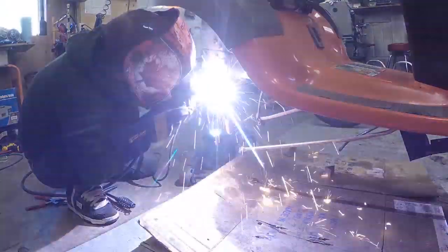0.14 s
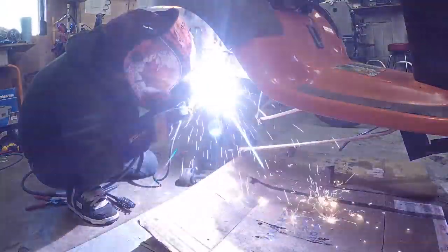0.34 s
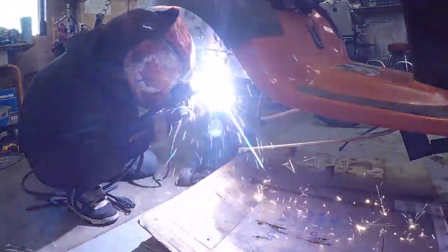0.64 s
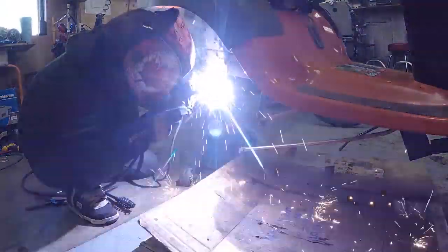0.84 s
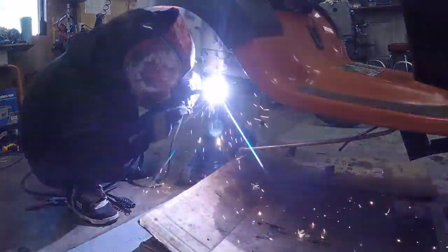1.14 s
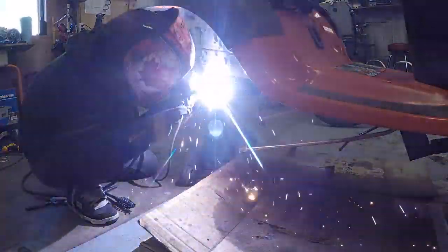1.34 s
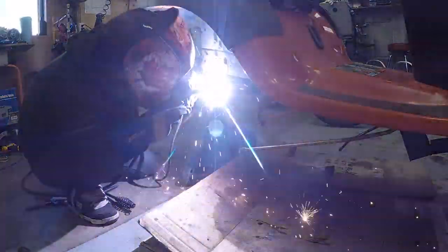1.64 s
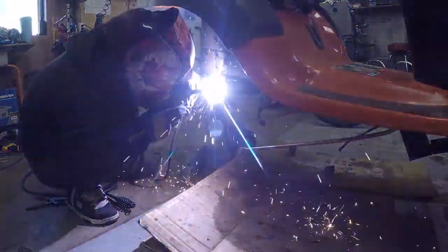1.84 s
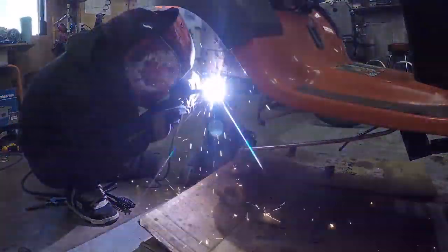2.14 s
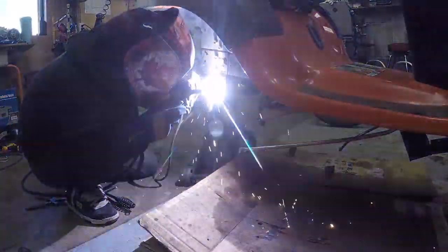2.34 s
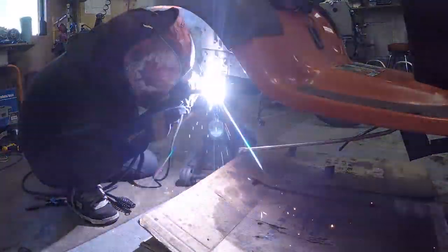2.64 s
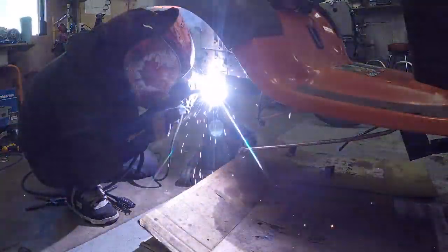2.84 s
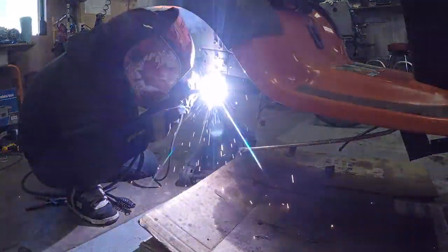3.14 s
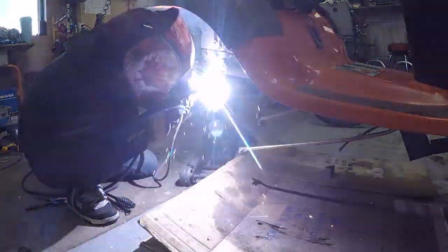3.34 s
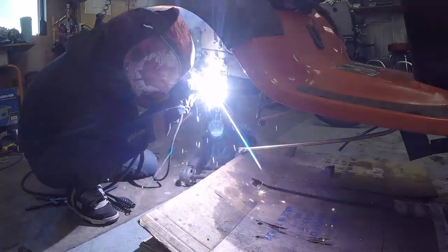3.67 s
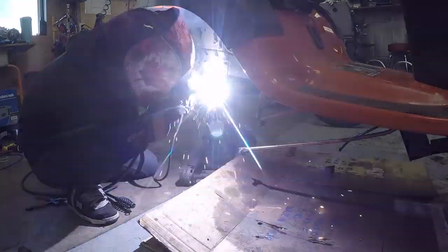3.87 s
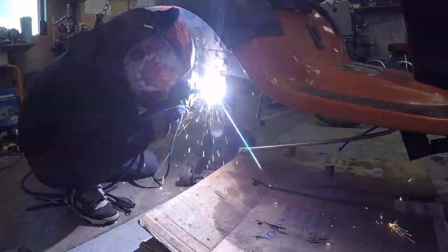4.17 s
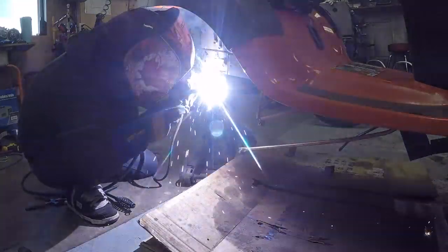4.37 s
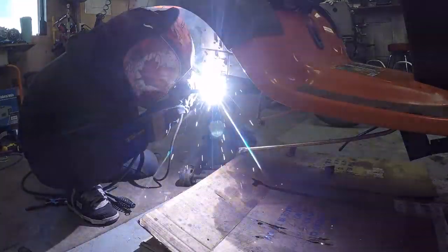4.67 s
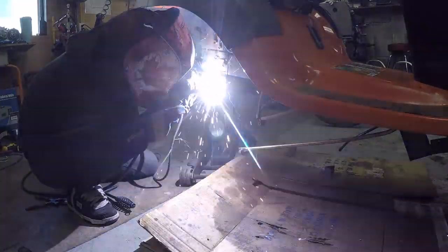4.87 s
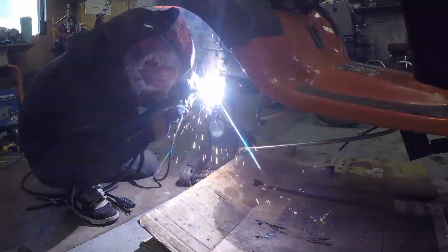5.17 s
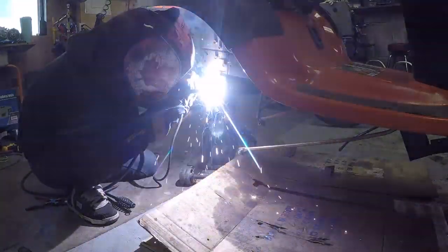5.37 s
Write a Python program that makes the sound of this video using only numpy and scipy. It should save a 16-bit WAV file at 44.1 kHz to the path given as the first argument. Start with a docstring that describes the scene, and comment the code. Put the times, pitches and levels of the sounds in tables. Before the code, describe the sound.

Close to the microphone, a welding arc on steel spits and fries in rapid surges, each sagging briefly before the next. Irregular sharp pops of bursting metal drops punctuate it, the loudest a little after three seconds. Below run a steady low transformer hum, a fan's whir, a slow motor throb and soft cooling air. Short metallic reflections and a small workshop tail surround the crackle. Mono, already running at the start and still going at the end.

```python
"""Close by, a stick-welding arc fries in surges and pops on steel brackets, inside a workshop.
The frying is random snaps over thin hiss, crowded at the crests of the current; each pop is one click as a
drop of metal bridges the gap and bursts. Steel resonances colour them, and echoes and a tail give the room.
Underneath, sine lines make the welding transformer's hum, its fan's whir and a slow motor's throb;
filtered noise makes the rush of cooling air."""
import sys
import numpy as np
from scipy import signal
from scipy.fft import rfft, irfft, next_fast_len
from scipy.io import wavfile

SR = 44100
rng = np.random.default_rng(int(sys.argv[2]) if len(sys.argv) > 2 else 0)


def master(y):
    """Save y as 16-bit WAV."""
    cut = np.clip(np.atleast_2d(y).T, -1, 1)
    pcm = np.round(cut * 32767)  # scale
    wavfile.write(sys.argv[1], SR, pcm.astype(np.int16))


N = 242991
TIME = np.arange(N) / SR
SIZE = next_fast_len(N + SR)  # FFT length, with a second of room for the tail
HZ = np.maximum(np.arange(SIZE // 2 + 1) * SR / SIZE, 1)
MAINS_HZ = 59.98
POP_S = .0025  # nominal length that sets the strength of a one-sample click

# drops of metal bursting: t/s, click level before the mix/dB, extra treble/dB,
# hush of the short circuit before it/dB
DROPS = [(0.0772, -20.5, -1.5, -5.0), (0.1174, -19.5, -4, -8), (0.2505, -15, -5, -2.5),
         (0.372, -15.5, -4, -3), (0.7427, -17, -1, -5.0), (0.7595, -15, 0, -6), (0.9332, -13.5, -3, -2),
         (0.9754, -13, -13, -3.5), (1.067, -18.5, -4, -2), (1.1992, -21, 1, -8), (1.5396, -16, -1, -1),
         (1.7045, -20.5, -3, -6), (1.7502, -18.5, 0, -3), (2.1056, -19, 0.5, -9), (2.3567, -13.5, -6, -8),
         (2.9782, -18, -1.5, -4), (3.3132, -9, -0.5, -3), (3.791, -21, 1.5, -5.0), (4.046, -22.5, 3, -4),
         (4.3271, -19, -1.5, -3), (4.4212, -21, 0, -7), (4.6461, -17.5, -4, -5.0), (4.784, -21, -1.5, -2),
         (4.8787, -18.5, 1, -2), (5.0024, -15, -6, -3), (5.3388, -15.5, -4, -3), (5.419, -16, -0.5, -5.0)]


def from_db(db):
    """Decibels to gain."""
    return 10 ** (np.asarray(db) / 20)


def rms_one(x):
    """Scale to rms 1."""
    return x / np.sqrt(np.mean(x ** 2) + 1e-20)


def drift(rate):
    """Slow chance of spread 1, turning about `rate` times a second: twice-smoothed noise."""
    step = 40  # samples between slow values
    pole = np.exp(-2 * np.pi * rate * step / SR)
    noise = rng.standard_normal(N // step + 2002)
    slow = signal.lfilter([1], [1, -2 * pole, pole * pole], noise)[2000:]  # skip the settling
    return np.interp(np.arange(N) / step, np.arange(len(slow)), rms_one(slow))


def colour(spectrum, resonances=()):
    """Causal (minimum-phase) response of unit power from a broad spectrum with resonance peaks on it."""
    hz, level_db = np.transpose(spectrum)
    shape = np.interp(np.log(HZ), np.log(hz), level_db)
    for centre, width, boost in resonances:
        shape = shape + boost / (1 + (2 * (HZ - centre) / width) ** 2)
    # folding the cepstrum onto positive times makes the phase minimal
    cepstrum = irfft(np.log(rms_one(from_db(shape))), SIZE)
    cepstrum[1:SIZE // 2] *= 2
    cepstrum[SIZE // 2 + 1:] = 0
    return np.exp(rfft(cepstrum))


def through(x, response):
    """Filter by a frequency response."""
    return irfft(rfft(x, SIZE) * response, SIZE)[:N]


def treble(x, hz):
    """The part of a sound above a gentle first-order corner."""
    return signal.sosfilt(signal.butter(1, hz, "high", fs=SR, output="sos"), x)


def tones(lines, waver_db, waver_rate, phase_wander):
    """Steady machine lines (f/Hz, rms level/dB), each wavering a little in level and phase (radians)."""
    out = np.zeros(N)
    for hz, level_db in lines:
        phase = 2 * np.pi * (hz * TIME + rng.random()) + phase_wander * drift(waver_rate)
        gain = np.sqrt(2) * from_db(level_db + waver_db * drift(waver_rate))
        out += gain * np.sin(phase)
    return out


def cooling_air():
    """Rush of the cooling air: noise shaped by a broad spectrum."""
    # relative density of the rush: f/Hz, level per Hz/dB
    air_spectrum = [(15, -36), (27, -26), (36, -2), (52, 3), (80, 1), (105, -8), (160, -6), (220, 1),
                    (275, -5), (335, -3), (430, -12), (750, -25.5), (1500, -30), (5000, -26), (12000, -48)]
    return from_db(-35.5) * through(rng.standard_normal(N), colour(air_spectrum))


def transformer_hum():
    """The welding transformer hums on multiples of the mains."""
    # hum lines: multiple of the mains frequency, rms level/dB
    hum_lines = [(1, -43.5), (2, -32), (3, -45.5), (4, -35), (5, -47.5), (6, -45), (7, -54), (8, -60.5),
                 (10, -63)]
    lines = [(k * MAINS_HZ, db) for k, db in hum_lines]
    return tones(lines, waver_db=1.03, waver_rate=2.8, phase_wander=0.052)


def fan_whir():
    """The fan whirs on a few lines that waver in level and phase."""
    # fan tones: f/Hz, rms level/dB
    fan_lines = [(28.4, -60), (327.9, -37.5), (528, -62), (648, -62), (1749, -60.5)]
    return tones(fan_lines, waver_db=2.0, waver_rate=3.9, phase_wander=0.17)


def slow_motor():
    """The motor throbs on multiples of its stroke rate, its level moving slowly."""
    stroke_hz = 8.54
    # motor lines: multiple of the stroke rate, rms level before the throb/dB
    motor_lines = [(3, -41.5), (5, -45), (6, -40), (8, -39.5), (9, -44.5), (10, -42.5), (11, -45),
                   (19, -51), (23, -46), (24, -51.5), (26, -53.5), (27, -49.5)]
    # level of the throb: t/s, level/dB
    throb = [(0, -0.5), (.8, -0.5), (1.6, 1), (2.3, -2), (3.75, 0.5), (4.4, -2.5), (5.0, -2.5), (5.5, 2.5)]
    lines = [(k * stroke_hz, db) for k, db in motor_lines]
    motor = tones(lines, waver_db=0.5, waver_rate=0.67, phase_wander=0.7)
    return from_db(np.interp(TIME, *np.transpose(throb))) * motor


def machines():
    """The bed under the arc: hum, whir, throb and air."""
    return transformer_hum() + fan_whir() + slow_motor() + cooling_air()


def workshop(x, t60, treble_t60, tail_db, onset_s, wall_hz, path_spread):
    """Direct sound, echoes from the floor and the machine body, then a diffuse tail whose treble dies first."""
    # surfaces near the arc: delay/s, level/dB
    echoes = [(.0026, -12), (.0052, -9), (.0061, -11.5), (.0072, -9), (.0081, -12), (0.0176, -13)]
    t, noise = TIME[:SR], rng.standard_normal(SR)
    bright = treble(noise, wall_hz)
    tail = (noise - bright) * from_db(-60 * t / t60) + bright * from_db(-60 * t / treble_t60)
    tail = tail * (1 - np.exp(-t / onset_s))
    response = from_db(tail_db) * tail / np.linalg.norm(tail)
    response[0] += 1  # direct sound
    for delay, level_db in echoes:
        path_s = delay * np.exp(path_spread * rng.standard_normal())
        response[int(path_s * SR)] += from_db(level_db)
    return through(x, rfft(response / np.linalg.norm(response), SIZE))


def scatter(shortest_s, spread_s, grain_hz):
    """All-pass response: each pitch finds its own way round the steelwork, so a click becomes a short spit."""
    knots = np.arange(0, SR, grain_hz)
    delay = np.interp(HZ, knots, shortest_s + spread_s * rng.random(len(knots)))
    return np.exp(-2j * np.pi * np.cumsum(delay) * SR / SIZE)


def weld_pool(sparks, count, size):
    """Every `size` samples the arc picks one of `count` spots, each with its own paths to the microphone."""
    # broad colour of the crackle: f/Hz, relative level per Hz/dB
    crackle_spectrum = [(60, -20), (350, -2.5), (600, -2.5), (850, -12), (1450, -16.5), (1850, -10),
                        (2150, -7.5), (2750, -0.5), (3550, -9), (4800, 0.5), (6600, -8.5), (7600, -6.5),
                        (9200, -11), (11500, -13.5), (13000, -5), (15200, -10)]
    # resonances of the steel and the hollows around the arc: f/Hz, width/Hz, boost/dB
    steel_peaks = [(1120, 295, 9), (2011, 92, 8.5), (2304, 48, 2.5), (2870, 120, 2.5), (4270, 220, 3.5),
                   (4550, 74, -4), (5010, 70, 2.5), (4995, 190, 5.5), (5620, 190, 4), (7200, 70, 8),
                   (7580, 71, 4), (7690, 95, 8), (10200, 360, 4)]
    spot = rng.integers(0, count, N)[np.arange(N) // size]
    steel = colour(crackle_spectrum, steel_peaks)
    out = np.zeros(N)
    for k in range(count):
        paths = scatter(shortest_s=.0001, spread_s=0.002025, grain_hz=300.2)
        spits = through(sparks * (spot == k), steel * paths)
        out += workshop(spits, t60=0.37, treble_t60=0.24, tail_db=-4.0, onset_s=0.0033,
                        wall_hz=5300, path_spread=.02)
    return out


def burn():
    """How hard the arc burns, in dB: surge after surge, hushed while a drop shorts the gap."""
    # surges, about three or four a second: t/s, length/s, crackle level at the crest before the mix/dB
    surges = [(0, 0.0265, -30), (0.125, .2, -29.5), (0.405, 0.12, -32.5), (0.579, 0.058, -29),
              (.75, 0.054, -34), (0.844, 0.1, -28.5), (1.06, .11, -38), (1.193, 0.099, -32),
              (1.419, 0.21, -33), (1.758, 0.22, -35), (2.127, 0.25, -34), (2.433, .3, -33),
              (2.769, 0.22, -32.5), (3.081, 0.29, -33.5), (3.421, 0.27, -33), (3.788, .18, -32.5),
              (4.078, 0.039, -35.5), (4.117, .16, -33), (4.313, 0.087, -35.5), (4.434, 0.21, -33),
              (4.763, .23, -33), (5.101, 0.18, -32.5), (5.417, .09, -33)]
    # a surge flares up from below, swells towards its crest, then sags to a weak simmer
    flare_db, flare_s, swell_db, sag_db_per_s, simmer_db = 4.5, .025, 1.5, 121.5, -45.5
    short_s = 0.02  # how long a drop bridges the gap before it bursts
    arc_db = np.full(N, simmer_db)
    for start, length, crest_db in surges:
        age = np.maximum(TIME - start, 0)
        flare = flare_db * np.exp(-age / flare_s)
        swell = swell_db * np.maximum(1 - age / length, 0)
        sag = sag_db_per_s * np.maximum(age - length, 0)
        surge_db = crest_db - flare - swell - sag
        arc_db = np.where(TIME >= start, np.maximum(arc_db, surge_db), arc_db)
    for when, _, _, hush_db in DROPS:
        shorted = (TIME > when - short_s) & (TIME < when)
        arc_db = arc_db + hush_db * shorted
    return arc_db


def roar(arc_db, level_db, growth, low_hz, high_hz):
    """Hot gas rushing from the rod's coating: band noise that grows faster than the arc, dB for dB."""
    band = signal.butter(2, [low_hz, high_hz], "band", fs=SR, output="sos")
    gas = signal.sosfilt(band, rng.standard_normal(N))
    return from_db(level_db + growth * (arc_db - arc_db.mean())) * rms_one(gas)


def spatter(arc_db, treble_db, treble_hz):
    """Small drops burst at random: duller clicks whose level follows the arc that throws them."""
    drops_per_s, above_arc_db, spread_db = 22, 1.0, 0.5
    born = rng.random(N) < drops_per_s / SR
    clicks = born * from_db(arc_db + above_arc_db + spread_db * rng.uniform(-1.3, 1, N))
    dulled = clicks + (from_db(treble_db) - 1) * treble(clicks, treble_hz)
    return dulled * np.sqrt(POP_S * SR)


def pops(treble_hz):
    """A drop shorts the arc and blows apart: one loud click, with its own share of treble."""
    when, level_db, treble_db, _ = np.transpose(DROPS)
    at = np.clip((when * SR).astype(int), 0, N - 1)
    body, top = np.zeros((2, N))
    body[at] = from_db(level_db)
    top[at] = from_db(level_db + treble_db)
    return (body + treble(top - body, treble_hz)) * np.sqrt(POP_S * SR)


def frying(arc_db, snaps_per_s, spread_db, ripple_db, hiss_db, crowding, sputter_db, sputter_rate):
    """Random snaps over a thin hiss; a harder arc snaps more often, and most at the crests of the current."""
    # the current crests twice in each mains cycle
    ripple = from_db(ripple_db * np.sin(2 * np.pi * 2 * MAINS_HZ * TIME))
    rate = snaps_per_s * from_db(crowding * (arc_db - arc_db.mean()))
    sizes = from_db(spread_db * np.minimum(rng.exponential(1, N), 3)) * rng.choice([-1, 1], N)
    born = rng.random(N) < rate * ripple / SR
    snaps = rms_one(born * sizes / np.sqrt(rate))  # crowding alone adds no power
    hiss = from_db(hiss_db) * rng.standard_normal(N)
    # the snaps come in clumps as the molten tip sways
    sputter = from_db(sputter_db * drift(sputter_rate))
    return from_db(arc_db) * rms_one(sputter * (snaps + hiss))


def arc():
    """Frying, pops and spatter heard by way of the weld pool's surroundings, with the rush of gas."""
    arc_db = burn()
    fry = frying(arc_db, snaps_per_s=1600, spread_db=3.0, ripple_db=2.5, hiss_db=-14, crowding=.4,
                 sputter_db=2.5, sputter_rate=104)
    # a harder arc is also a brighter one
    brightness = from_db(0.051 * (arc_db - arc_db.mean()))
    fry = fry + (brightness - 1) * treble(fry, hz=7950)
    sparks = from_db(.5) * fry + from_db(-6.0) * pops(treble_hz=7000)
    sparks = sparks + spatter(arc_db, treble_db=-5, treble_hz=7000)
    gas = roar(arc_db, level_db=-63.5, growth=1.4, low_hz=288, high_hz=670)
    return weld_pool(sparks, count=2, size=256) + gas


def scene():
    """The arc over the machines, in mono."""
    return (machines() + arc())[None]


def record(dry):
    """A steep elliptic low-pass cuts the top."""
    cutoff_hz = 15400
    return signal.sosfilt(signal.ellip(12, .1, 90, cutoff_hz, fs=SR, output="sos"), dry)


dry = scene()
out = record(dry)
master(out)
```